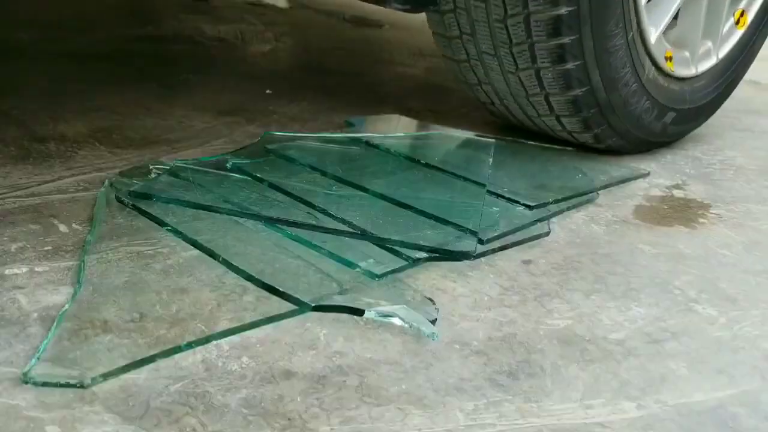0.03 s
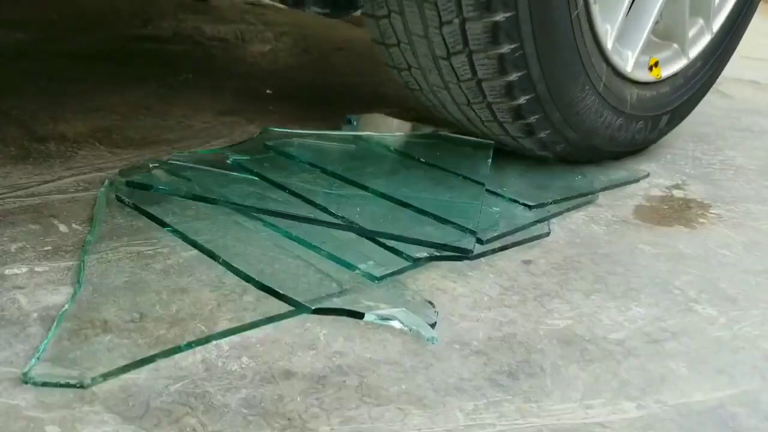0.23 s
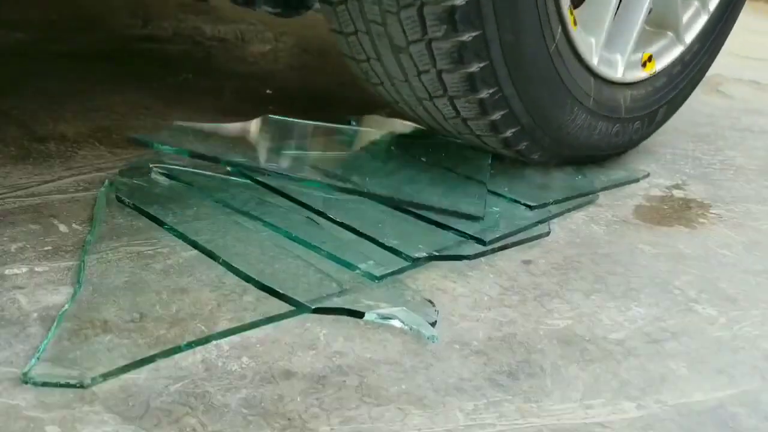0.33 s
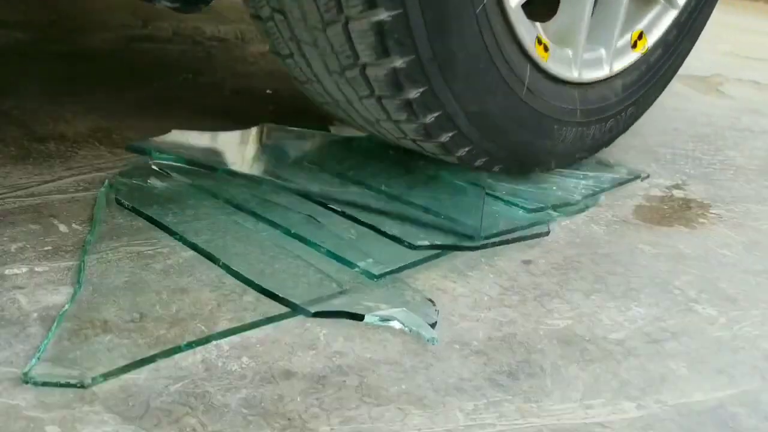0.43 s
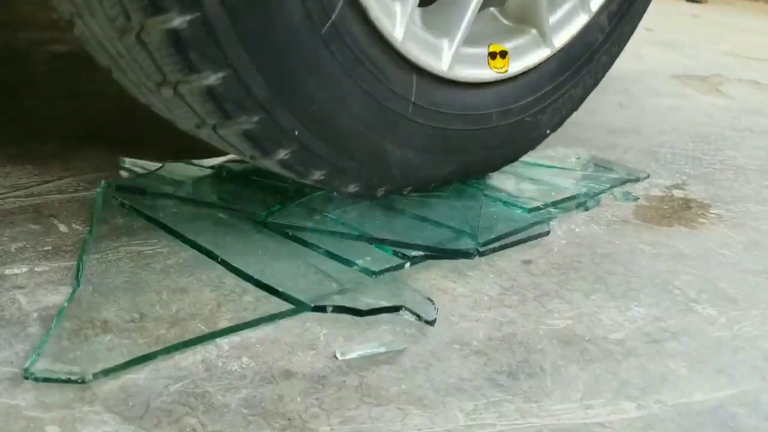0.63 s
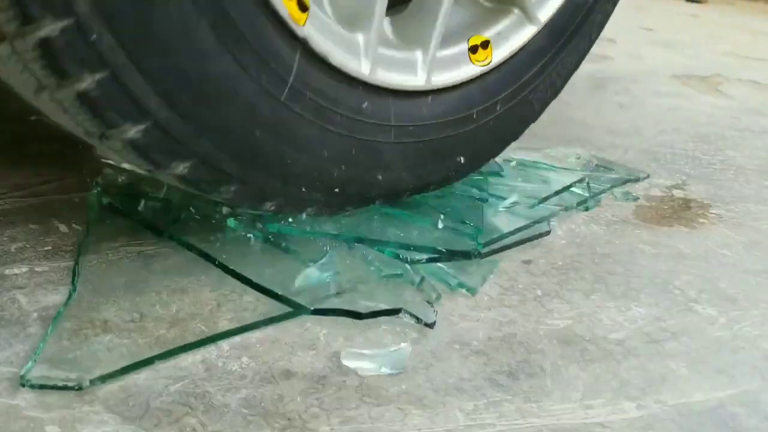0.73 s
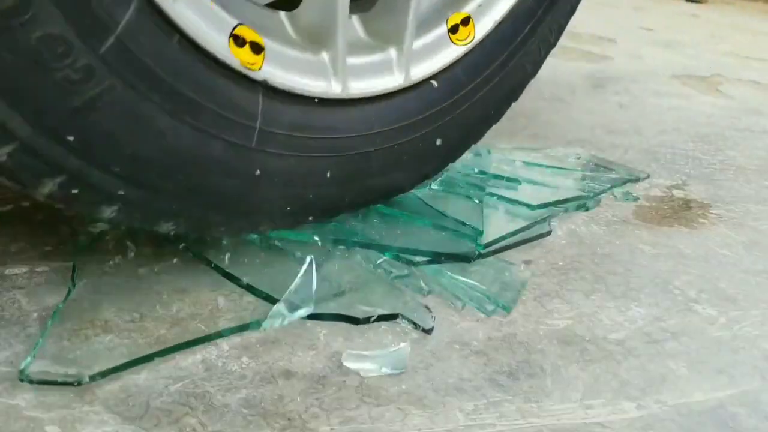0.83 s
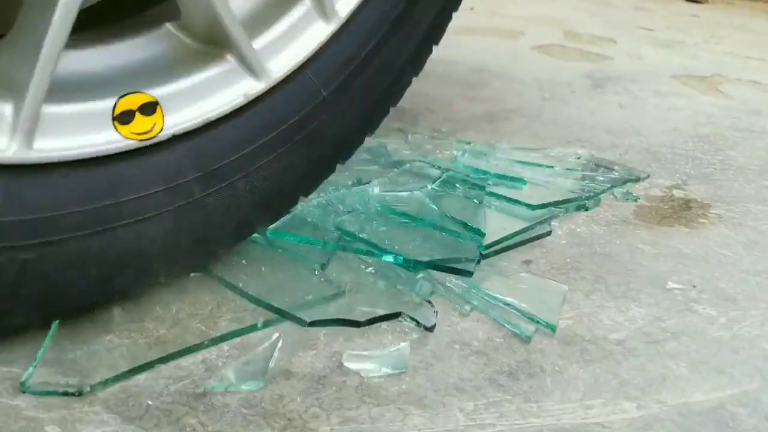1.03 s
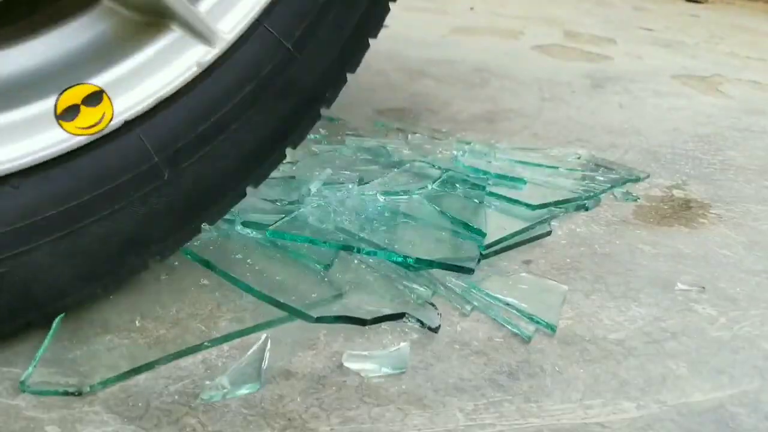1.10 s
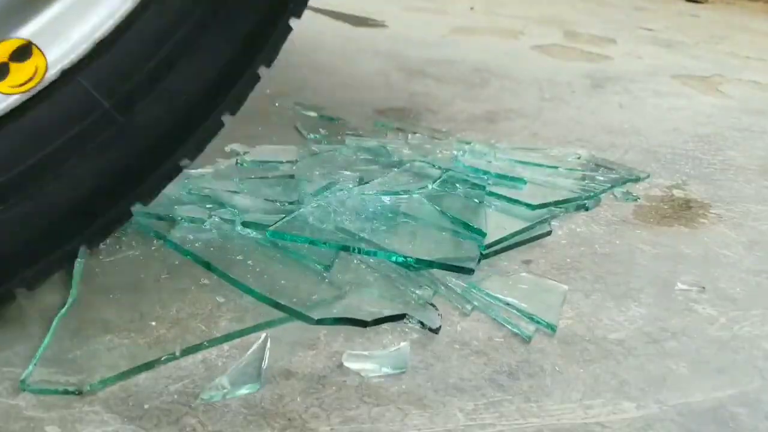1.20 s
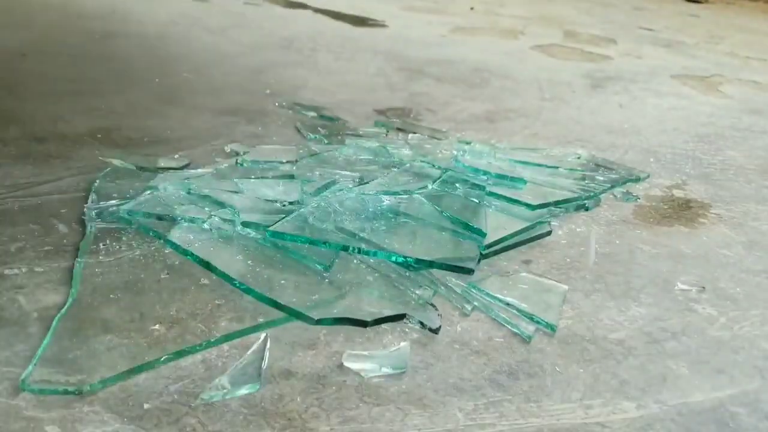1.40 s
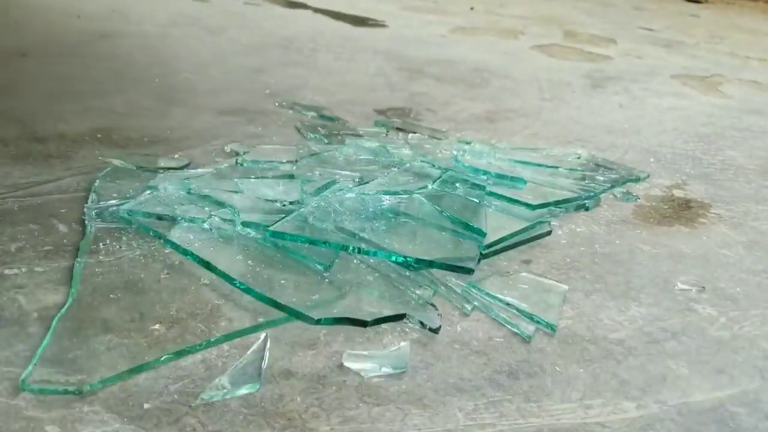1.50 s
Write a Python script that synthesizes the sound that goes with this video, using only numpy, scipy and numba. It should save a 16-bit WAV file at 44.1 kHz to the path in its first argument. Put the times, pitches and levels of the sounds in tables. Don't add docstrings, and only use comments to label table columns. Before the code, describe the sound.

Glass panes shatter under a car tyre on concrete, close and dry, leaning slightly left. Silence until about 0.2 s, then dense crunching swells quickly, with rapid sharp snaps and bright short rings from 0.25 to 0.85 s. Pieces knock the floor over soft low thuds. A final hard clack comes near 0.97 s; tinkles and ticks thin out over a faint low hum, nearly quiet by 1.4 s.

```python
import sys
import numpy as np
from scipy import signal
from scipy.fft import rfft, irfft, next_fast_len
from scipy.io import wavfile
from numba import njit

SR = 44100
rng = np.random.default_rng(int(sys.argv[2]) if len(sys.argv) > 2 else 0)


def waveform_to_disk(signal):
    frames = np.transpose(np.atleast_2d(signal))
    scaled = np.clip(frames, -1, 1) * 32767
    samples = np.round(scaled).astype(np.int16)
    wavfile.write(sys.argv[1], SR, samples)


def magnitude_from_level(level_db):
    exponent = np.asarray(level_db, float) / 20
    return 10 ** exponent


N = 68355
TIME_S = np.arange(N) / SR
START_S = 0.16
LEFT_RIGHT = np.array([[1], [-1]])


def rms_one(x):
    return x / np.sqrt(np.mean(x ** 2) + 1e-20)


def in_time(rows):
    return np.interp(TIME_S, *np.transpose(rows))


def at_hz(points, hz):
    table_hz, values = np.transpose(points)
    return np.interp(np.log(hz), np.log(table_hz), values)


def drift(rate_hz):
    r = np.exp(-40 * np.pi * rate_hz / SR)
    noise = rng.standard_normal(N // 20 + 2002)
    slow = signal.lfilter([1], [1, -2 * r, r * r], noise)[2000:]
    return np.interp(np.arange(N) / 20, np.arange(len(slow)), rms_one(slow))


def ring(clicks, hz, t60_s):
    r, w = magnitude_from_level(-60 / (t60_s * SR)), 2 * np.pi * hz / SR
    return signal.lfilter([0, np.sin(w)], [1, -2 * r * np.cos(w), r * r], clicks + 1e-18)


def dying(start_s, t60_s):
    out, start = np.zeros(N), int(start_s * SR)
    t = np.arange(min(N - start, int(1.5 * t60_s * SR))) / SR
    out[start:start + len(t)] = np.clip(t * 4000, 0, 1) * magnitude_from_level(-60 * t / t60_s)
    return out


def band_pass(x, order, low_hz, high_hz):
    return signal.sosfilt(signal.butter(order, [low_hz, high_hz], "band", fs=SR, output="sos"), x)


def room(x):
    t60_s, wall_cut_hz = 0.22, 9300
    size = next_fast_len(N + SR // 3)
    w = 2 * np.pi * np.arange(size // 2 + 1) / size
    dull = 1 / (1 + 1j * w * SR / (2 * np.pi * wall_cut_hz))
    loops = []
    for lag_s in rng.uniform(.008, .035, 16):
        loops.append(magnitude_from_level(-60 * lag_s / t60_s) * dull * np.exp(-1j * w * lag_s * SR))
    sides = [sum(g / (1 - g) * (-1) ** k for k, g in enumerate(loops[c::2])) for c in (0, 1)]
    return irfft(rfft(x, size) * np.array(sides), size)[:, :N]


# time [s], crunch level [dB].
CRUNCH_LOAD = [(.182, -68), (.19, -36.5), (.215, -25), (.25, -14), (.33, -9.5), (.385, -15), (.43, -10),
               (.476, -20.5), (.53, -12.5), (.6, -13.5), (.655, -16.5), (.745, -19), (.83, -21),
               (.95, -27.5), (1.08, -39.5), (1.2, -48.5), (1.285, -57.5), (1.305, -69.5), (1.55, -74.5)]
# frequency [Hz], level [dB per Hz].
RUMBLE_SPECTRUM = [(25, -5.5), (60, -4.5), (150, -1.5), (400, -11), (1000, -22)]


def rumble():
    level_db, follows, rise_s = -42.5, 0.47, 0.22
    mid, side = rng.standard_normal((2, N))
    hz = np.maximum(np.arange(N // 2 + 1) * SR / N, 10)
    shape = magnitude_from_level(at_hz(RUMBLE_SPECTRUM, hz) - 12 * np.log2(np.maximum(hz / 1000, 1)))
    noise = rms_one(irfft(rfft(mid + .5 * side * LEFT_RIGHT) * shape, N))
    rise = np.clip((TIME_S - START_S) / rise_s, 0, 1)
    return noise * rise * magnitude_from_level(level_db + follows * (in_time(CRUNCH_LOAD) + 16) + 3.8 * drift(36))


def rustle():
    peak_s, length_s, level_db = 1.34, .08, -61
    grit = rms_one(band_pass(rng.standard_normal(N), 2, 280, 800))
    swell = np.exp(-((TIME_S - peak_s) / length_s) ** 2)
    return grit * magnitude_from_level(level_db + 3.7 * drift(43.8)) * swell


def cavity():
    pitch_hz, start_s, level_db, t60_s, octave_db = 193, 0.95, -40.5, 2.5, -21
    phase = 2 * np.pi * pitch_hz * TIME_S
    tone = np.sin(phase) + magnitude_from_level(octave_db) * np.sin(1.96 * phase)
    return magnitude_from_level(level_db) * dying(start_s, t60_s) * magnitude_from_level(drift(3)) * tone


# start [s], peak [dB], pitch [Hz].
TYRE_PUSHES = [
    (.285, -37, 40),
    (0.428, -28.5, 69.5),
    (0.504, -30, 68.6),
    (.785, -34, 90),
    (0.988, -31.5, 75),
]


def pushes():
    t60_s, out = 0.1, np.zeros(N)
    for s, db, hz in TYRE_PUSHES:
        out += magnitude_from_level(db) * dying(s, t60_s) * np.sin(2 * np.pi * hz * (TIME_S - s))
    return out


# start [s], peak [dB], pitch [Hz], t60 [s].
SHARD_TINKLES = [(0.719, -7, 9080, 0.044), (.69, -22, 9030, .15), (1.474, -68, 5000, .02),
                 (0.29, -10, 2560, 0.17), (0.479, -8.5, 3040, 0.036), (0.98, -15.5, 2880, 0.021),
                 (0.97, -16.5, 9400, .015), (1.07, -41, 9200, 0.12), (1.083, -33, 8700, 0.063),
                 (1.091, -28.5, 8576, 0.18), (1.2, -39, 8700, 0.11), (.963, -17, 4450, .015),
                 (1.6, -34.5, 2100, 0.018), (1.033, -23, 4090, 0.019), (0.23, -23, 10400, 0.04),
                 (1.112, -30.5, 1520, 0.025), (1.16, -38, 5000, 0.076), (1.26, -47, 3390, 0.065),
                 (1.278, -53, 3200, 0.06), (1.31, -54.5, 8500, 0.041)]


def tinkles():
    beat_hz, rough_db, lands_t60s, stop_s = 40.93, 3.5, .35, .01
    out = np.zeros((2, N))
    phases = rng.uniform(0, 2 * np.pi, (len(SHARD_TINKLES), 2, 1))
    for (s, db, hz, t60_s), phase in zip(SHARD_TINKLES, phases):
        pair = np.sin(2 * np.pi * hz * TIME_S + 0.093 * phase)
        pair = pair + .5 * np.sin(2 * np.pi * (hz + beat_hz) * TIME_S + phase)
        landing = np.clip((s + lands_t60s * t60_s - TIME_S) / stop_s + 1, 0, 1)
        out += magnitude_from_level(db + rough_db * drift(110)) * dying(s, t60_s) * landing * pair
    return out


# start [s], peak [dB], pitch [Hz], t60 [s].
FLOOR_KNOCKS = [(0.25, -19, 610, 0.032), (.282, -21, 760, 0.0085), (0.332, -12.5, 858, 0.14),
                (0.413, -5, 990, 0.015), (.454, -2.5, 950, 0.0089), (0.501, -1.5, 476, 0.0081),
                (.61, -17, 797, 0.083), (0.639, -13, 837, 0.077), (.664, -10, 906, 0.047),
                (0.75, -5, 880, 0.01), (0.766, -6.5, 780, 0.016), (0.784, -14.5, 288, 0.036),
                (.837, -11, 750, 0.045), (0.889, -9.5, 770, 0.012), (0.895, -20.5, 900, 0.012),
                (0.939, -21, 810, 0.0078), (.963, -10.5, 860, 0.014), (0.9694, 2, 584, 0.0088),
                (0.9698, -16, 283, 0.061), (.971, -19.5, 207, 0.021), (.975, -10.5, 897, 0.018),
                (.99, -19, 640, .04), (1.032, -27.5, 1310, 0.012), (1.055, -34, 500, 0.017),
                (1.071, -36, 390, .05), (1.11, -39.5, 290, .05), (1.541, -45.5, 454, .01)]


def knocks():
    under_db, low_cut_hz = -36.5, 161
    out = np.zeros(N)
    for s, db, hz, t60_s in FLOOR_KNOCKS:
        click = np.zeros(N)
        click[int(s * SR)] = magnitude_from_level(db)
        out += ring(click, hz, t60_s) + magnitude_from_level(under_db) * ring(click, 0.16 * hz, 1.5 * t60_s)
    return band_pass(out, 3, low_cut_hz, 2500)


# time of the break [s], depth [dB].
PINNED = [(0.265, -7.5), (.2805, -1.5), (.389, -4), (0.412, -3.5), (0.451, -5), (.4797, -8.5), (.502, -5),
          (0.629, -5.5), (0.664, -7), (0.751, -7.5), (0.7826, -3.5), (.837, -2), (0.888, -7), (0.961, -2),
          (1.032, -6)]


def hush():
    sink_s, gain_db = 0.0085, np.zeros(N)
    for s, db in PINNED:
        gain_db += db * np.clip(1 + (TIME_S - s) / sink_s, 0, 1) * (TIME_S < s)
    return magnitude_from_level(gain_db)


# start [s], peak [dB], loudest ring [Hz], tilt [dB per octave], burst t60 [s].
PANE_SNAPS = [(0.2504, -4.5, 1260, -5, 0.069), (0.2647, -3.5, 2950, 1.5, 0.045),
              (0.2803, -1, 2550, 1, 0.049), (0.2923, -3.5, 2620, 2.5, 0.074), (0.3091, 0, 3250, -4, 0.064),
              (0.3284, -0.5, 2150, -3, 0.086), (0.3439, -3, 2560, 0.5, 0.054),
              (0.3684, 0, 2220, 0.5, 0.052), (0.3901, -3, 3370, 2.5, 0.043), (0.411, -1.5, 3640, 4, 0.024),
              (0.4326, -5.5, 2010, 3, 0.026), (0.4529, -1, 1420, -3.5, 0.088),
              (0.4805, -0.5, 3210, 2.5, 0.033), (0.4912, 0.5, 2550, 1.5, 0.064),
              (0.5004, 1.5, 1680, -3.5, 0.089), (0.5212, -4, 2690, -1, 0.06), (0.5918, -2.5, 2500, 1, 0.07),
              (0.627, -3, 1900, -3.5, 0.047), (0.639, -2, 3520, -0.5, 0.02),
              (0.6629, 0.5, 2030, -0.5, 0.15), (0.679, 0, 2580, -1, 0.13), (0.6932, -4, 2840, -2, 0.13),
              (0.7485, -1, 3180, 2, 0.093), (0.7655, -2.5, 3310, 1, 0.14), (0.7811, 3.5, 3050, 1.5, 0.088),
              (0.836, -5, 1880, 1.5, 0.12), (0.8884, -16, 3280, -2.5, 0.036),
              (0.9635, -10, 4450, 3.5, 0.047), (0.9692, -3.5, 2880, 2.5, 0.024),
              (1.0308, -14, 4090, 2, 0.033)]
# start [s], peak [dB], loudest ring [Hz].
SPLINTER_TICKS = [(0.1995, -32, 3590), (0.2217, -10, 10700), (0.2437, -0.5, 1270), (0.3174, -13, 3190),
                  (0.3561, -9, 2610), (0.3768, -1, 1820), (0.4035, -9, 2160), (0.4246, -1, 3040),
                  (0.4575, -4, 1550), (0.4654, -3, 3280), (0.5068, -4.5, 2700), (0.513, -0.5, 2710),
                  (0.5381, -3.5, 2610), (0.5574, -11.5, 4270), (0.5732, -2.5, 3140), (0.6064, -6, 2530),
                  (0.67, 2.5, 2850), (0.7186, -5.5, 9090), (0.7564, 1, 2670), (0.7727, 2.5, 3870),
                  (0.7894, -4.5, 2710), (0.8033, -2.5, 3030), (0.8439, -9, 1890), (0.87, -14, 2850),
                  (0.8956, -12, 3290), (0.9056, -11, 8770), (0.938, -12.5, 4110), (0.9445, -9.5, 2830),
                  (1.0216, -17, 4100), (1.0555, -23.5, 9140), (1.0966, -21, 8580), (1.1096, -22, 8580),
                  (1.1603, -22, 3980), (1.1665, -22.5, 5110), (1.2268, -39, 3400), (1.2662, -45, 3400),
                  (1.2884, -47, 3180), (1.3526, -56, 10900), (1.3884, -63.5, 4220), (1.4734, -57.5, 3300),
                  (1.5404, -45.5, 9090)]


def breaks(pitches):
    snap_db, tail_db, tail_t60_s, tick_db, tick_t60_s = -7.5, -14.5, 0.2, -7.5, .008
    hump_db, hump_octaves, colour_db = 4, .3, 3
    bursts = []
    for s, db, _, _, t60_s in PANE_SNAPS:
        bursts.append(magnitude_from_level(db + snap_db) * (dying(s, t60_s) + magnitude_from_level(tail_db) * dying(s, tail_t60_s)))
    for s, db, _ in SPLINTER_TICKS:
        bursts.append(magnitude_from_level(db + tick_db) * dying(s, tick_t60_s))
    events = np.array([row[:4] for row in PANE_SNAPS] + [(*row, 0) for row in SPLINTER_TICKS])
    tilt = events[:, 3:] * np.log2(np.maximum(pitches, 700) / 3000)
    hump = hump_db * np.exp(-(np.log2(pitches / events[:, 2:3]) / hump_octaves) ** 2)
    colour = magnitude_from_level(tilt + hump + colour_db * rng.standard_normal((len(events), len(pitches))))
    return colour.T ** 2 @ np.array(bursts) ** 2, (events[:, 0] * SR).astype(int) + 12


@njit
def ring_changing(clicks, poles):
    out = np.zeros(clicks.shape)
    for c in range(clicks.shape[0]):
        z = 0j
        for i in range(clicks.shape[1]):
            z = z * poles[i] + clicks[c, i]
            out[c, i] = z.imag
    return out


# frequency [Hz], level [dB per Hz].
GLASS_COLOUR = [(150, -43), (450, -19.5), (800, -5), (1300, -5.5), (3000, -0.5), (6700, -10), (9300, -7),
                (12400, -12)]
# frequency [Hz], left-right likeness [0-1].
SIDE_LIKENESS = [(60, .8), (250, 0), (600, 0.7), (1200, 0.9), (2500, .05), (12000, .05)]
# time [s], tilt [dB per octave].
CRUSH_FINENESS = [(.19, -3.5), (.26, -3), (.3, -0.5), (.5, 1), (.8, 1.5), (1, 1), (1.2, 0), (1.5, 2.5)]


def glass():
    splinters_per_s, size_spread_db, first_break_db = 9000, 3.5, 9
    clump_db, clumps_per_s, shift_db, shifts_per_s = 1, 160, 4.5, 4.4
    shard_life_s, pitch_spread, ring_cycles, ring_spread = .04, .05, 34.3, 0.83
    chip_share, chip_rings_longer, chip_db = .05, 5.5, 0.5
    pitches = np.linspace(150 ** .3, 12700 ** .3, 48) ** (1 / .3)
    bed = magnitude_from_level(in_time(CRUNCH_LOAD) + clump_db * drift(clumps_per_s))
    fine = in_time(CRUSH_FINENESS)
    break_power, starts = breaks(pitches)
    out, power, chance = np.zeros((2, N)), 0, rng.random((4, N))
    sizes = magnitude_from_level(-size_spread_db * np.log(chance[1] + 0.012)) * np.sign(chance[2:] - .5)
    for k, hz in enumerate(pitches):
        draw = np.roll(chance[:2], 997 * k, axis=1)
        born = draw[0] < splinters_per_s / SR * np.sqrt(hz / 2000) / 8
        grains = rms_one(born * np.roll(sizes, 1811 * k, axis=1))
        grains[0, starts] = magnitude_from_level(first_break_db)
        tilt_db = fine * np.log2(max(hz, 700) / 3000)
        crunch = bed * magnitude_from_level(shift_db * drift(shifts_per_s) + tilt_db)
        force = np.sqrt(crunch ** 2 + break_power[k])

        shards = rng.uniform(-1, 1, (200, 3))
        now = ((TIME_S / shard_life_s + shards[0, 0] + 1) % len(shards)).astype(int)
        turn = 2j * np.pi * hz * (1 + pitch_spread * shards[:, :2].T) / SR
        t60_s = ring_cycles / hz * (hz / 2000) ** 0.4 * np.exp(ring_spread * shards[:, 2])
        loss = 3 * np.log(10) / (t60_s * SR)

        struck = grains * force * 2 * np.sqrt(loss)[now]
        chips = struck * (draw[1] < chip_share) * magnitude_from_level(chip_db) / np.sqrt(chip_rings_longer)
        rings = ring_changing(struck, np.exp(turn[0] - loss)[now])
        rings += ring_changing(chips, np.exp(turn[1] - loss / chip_rings_longer)[now // 3])
        mid, side = rings
        alike = np.clip(at_hz(SIDE_LIKENESS, hz), 0, 1)
        gain = magnitude_from_level(at_hz(GLASS_COLOUR, hz)) * hz ** 0.43
        out += gain * (np.sqrt(1 + alike) * mid + np.sqrt(1 - alike) * side * LEFT_RIGHT)
        power += gain ** 2
    return out / np.sqrt(3 * power)


# time [s], left minus right [dB].
IMAGE_LEAN = [(0.19, 3.5), (0.356, 3), (1.148, 2), (1.36, 2.5), (1.55, 5)]


def scene():
    low_cut_hz, room_db = 254, -17.5
    high_pass = signal.butter(2, low_cut_hz, "high", fs=SR, output="sos")
    near = signal.sosfilt(high_pass, glass() + tinkles()) + knocks()
    pile = hush() * (near + magnitude_from_level(room_db) * room(near.mean(axis=0)))
    lean = magnitude_from_level(in_time(IMAGE_LEAN) * LEFT_RIGHT / 2)
    return (pile + rustle() + cavity() + pushes() + rumble()) * lean


def low_pass(x):
    return signal.sosfilt(signal.butter(12, 12640, fs=SR, output="sos"), x)


def record(dry):
    fade_in_s, fade_out_s, cutoff_hz, drive_db = 0.023, 0.011, 12500, -1.03
    x = dry * np.clip((TIME_S - START_S) / fade_in_s, 0, 1)
    x = x * np.clip((N / SR - TIME_S) / fade_out_s, .3, 1)
    x = magnitude_from_level(drive_db) * signal.sosfilt(signal.ellip(8, .5, 50, cutoff_hz, fs=SR, output="sos"), x)
    mix = x / (1 + x ** 6) ** (1 / 6)
    return low_pass(mix)


dry = scene()
out = record(dry)
waveform_to_disk(out)
```